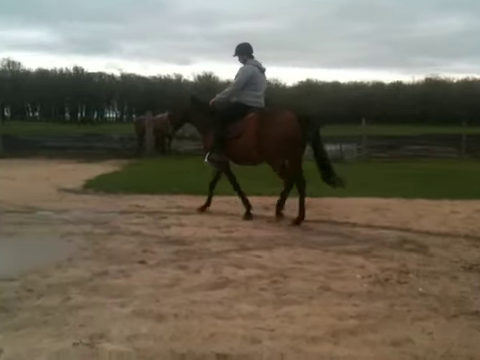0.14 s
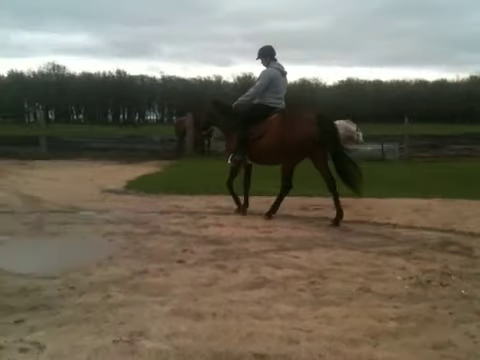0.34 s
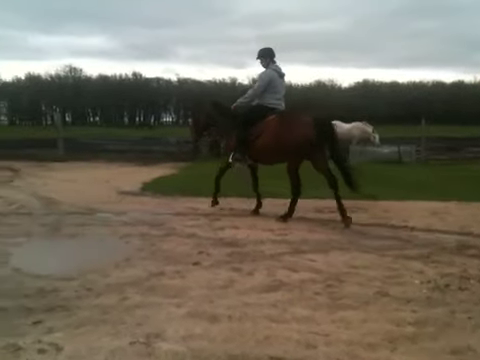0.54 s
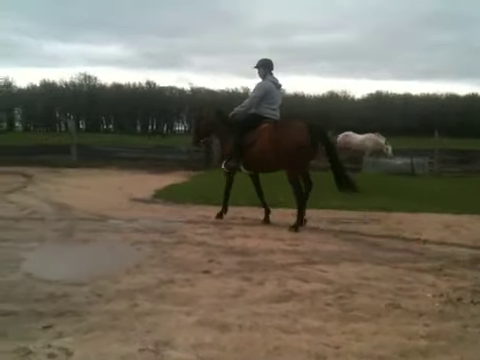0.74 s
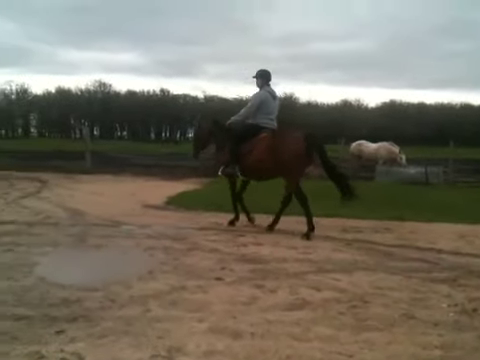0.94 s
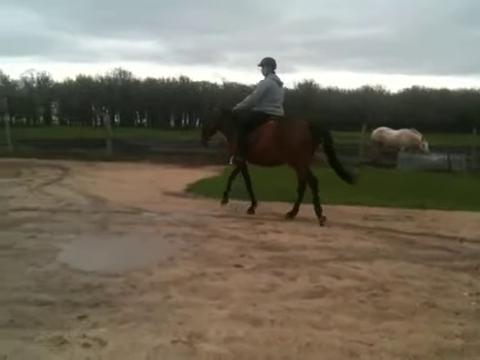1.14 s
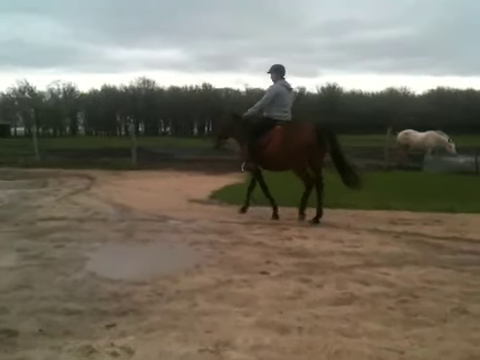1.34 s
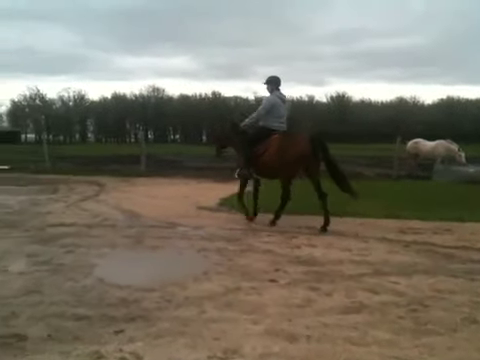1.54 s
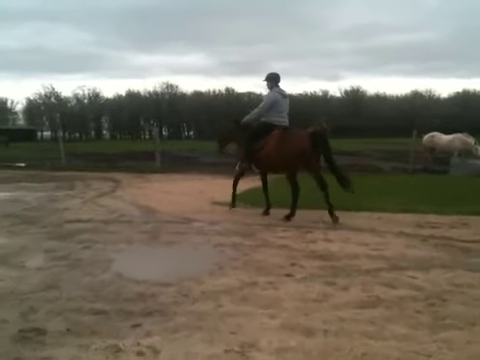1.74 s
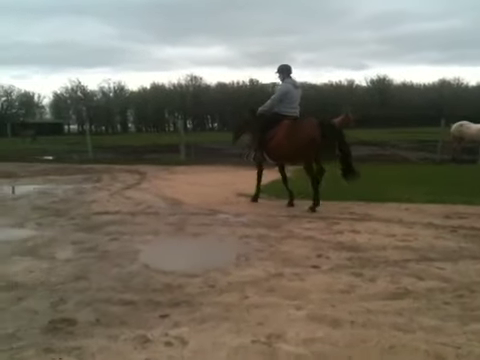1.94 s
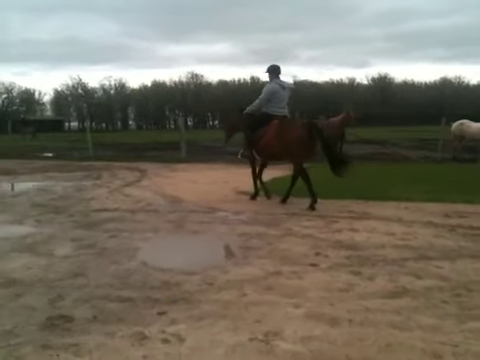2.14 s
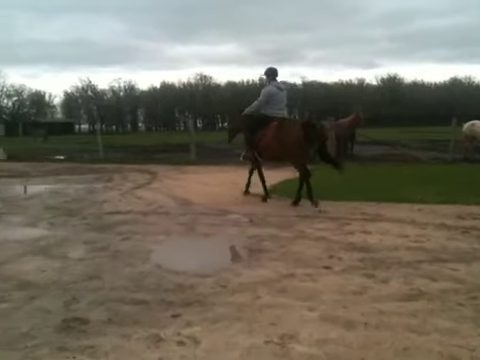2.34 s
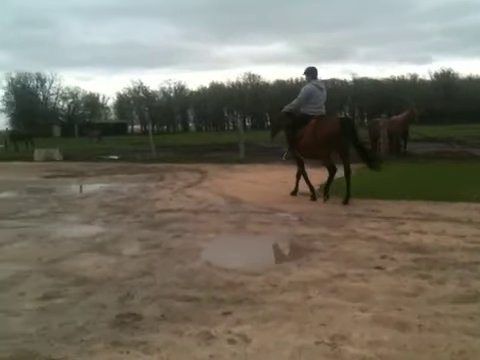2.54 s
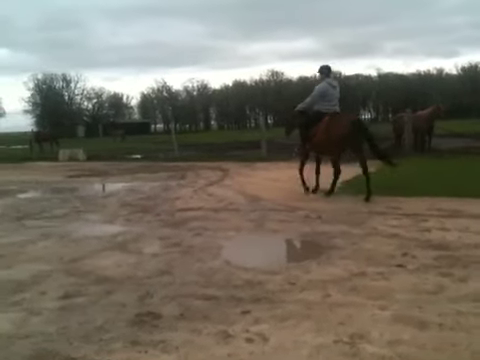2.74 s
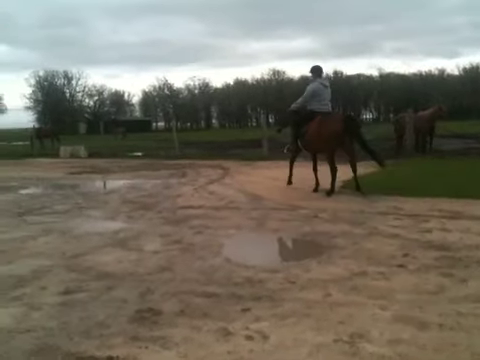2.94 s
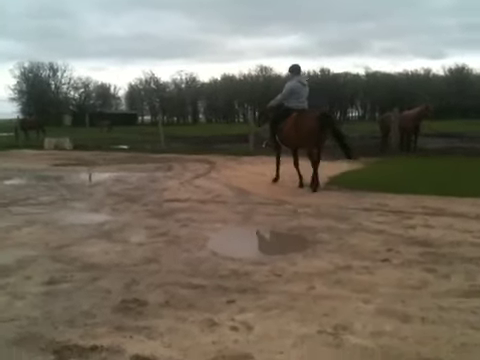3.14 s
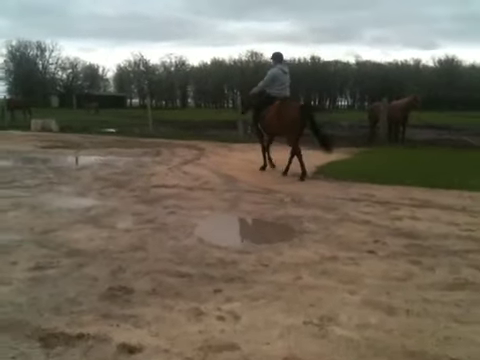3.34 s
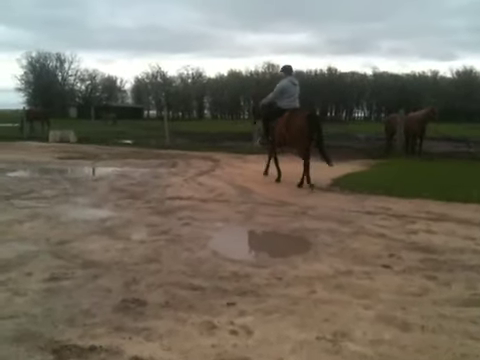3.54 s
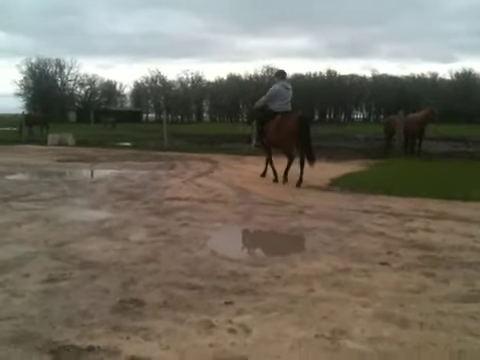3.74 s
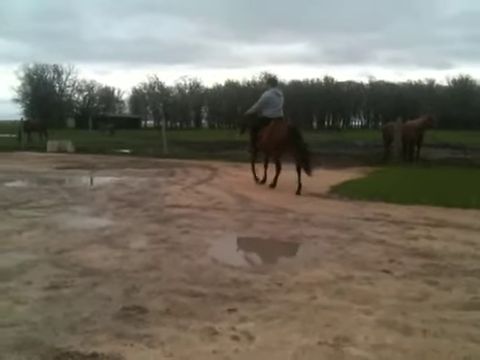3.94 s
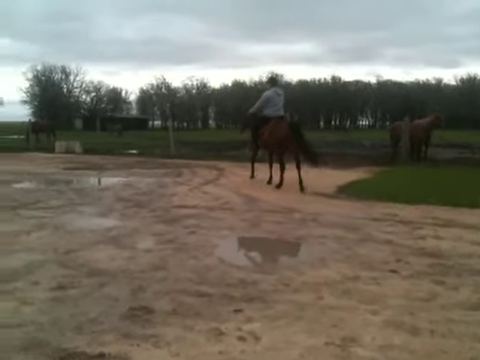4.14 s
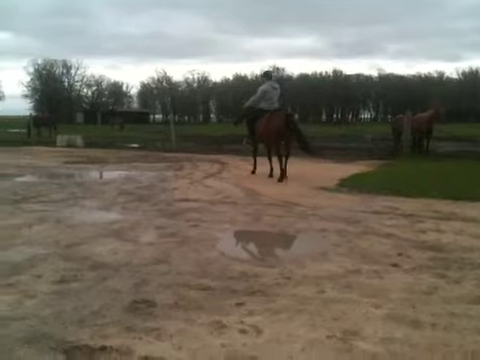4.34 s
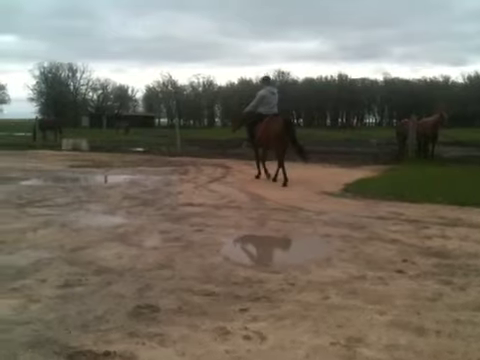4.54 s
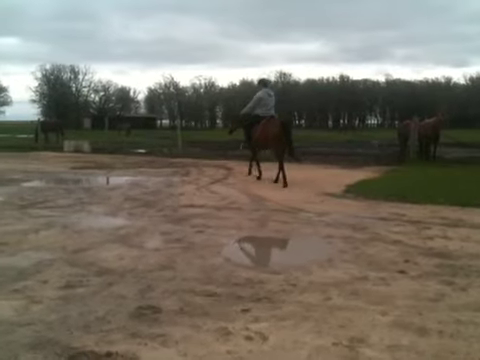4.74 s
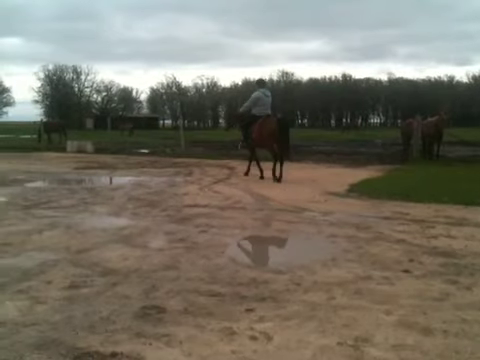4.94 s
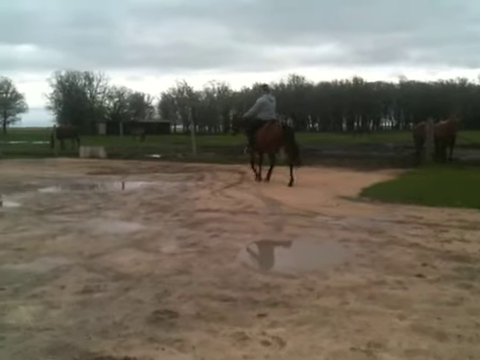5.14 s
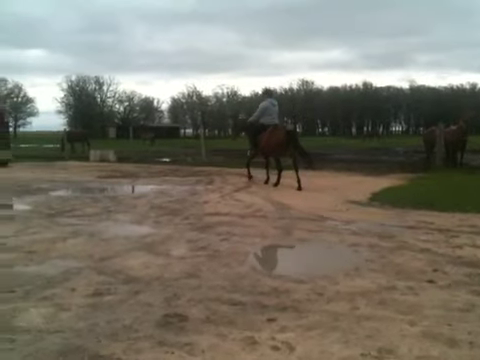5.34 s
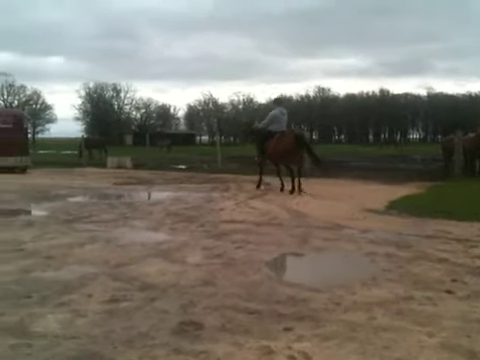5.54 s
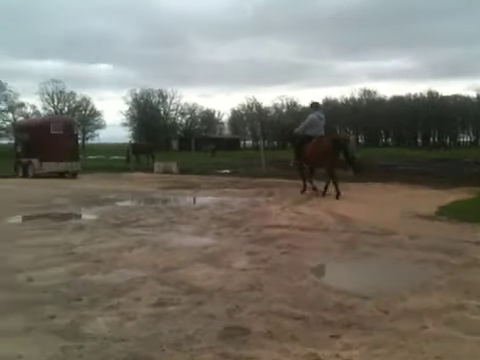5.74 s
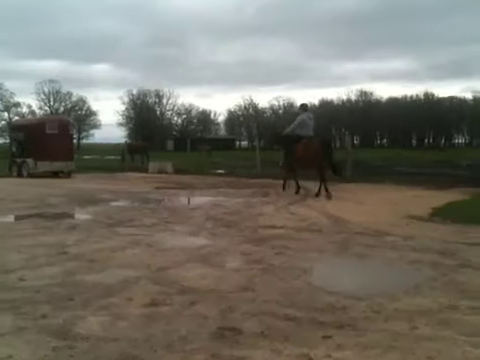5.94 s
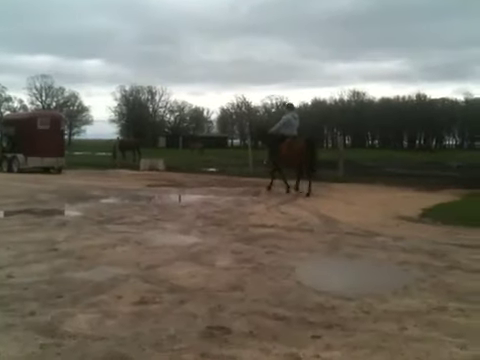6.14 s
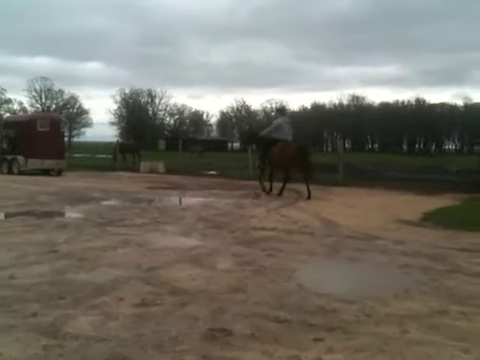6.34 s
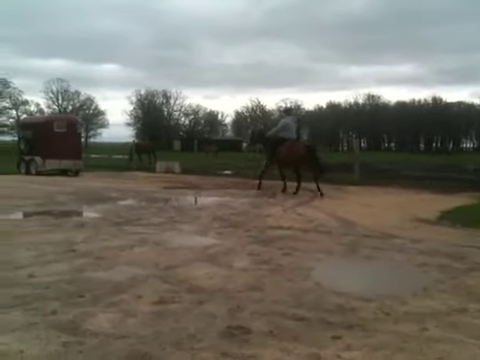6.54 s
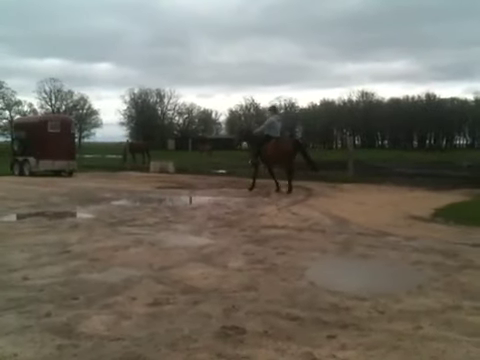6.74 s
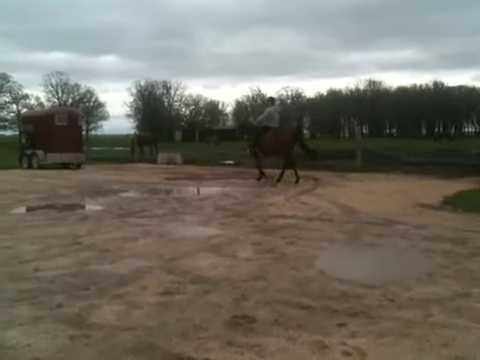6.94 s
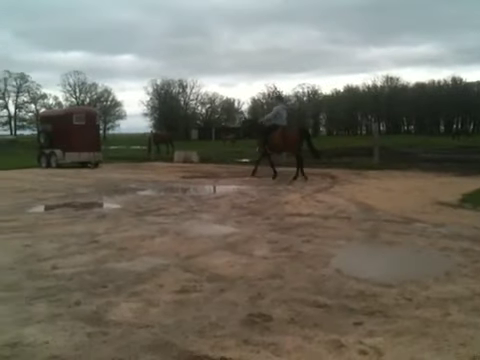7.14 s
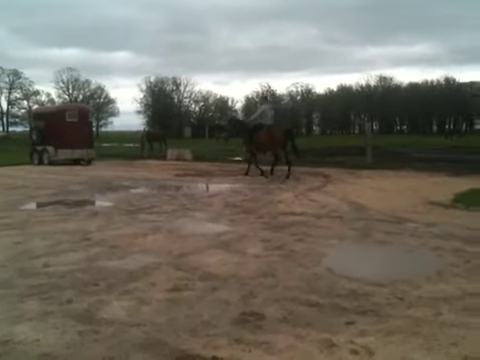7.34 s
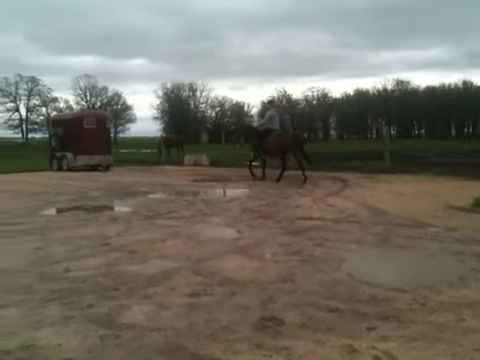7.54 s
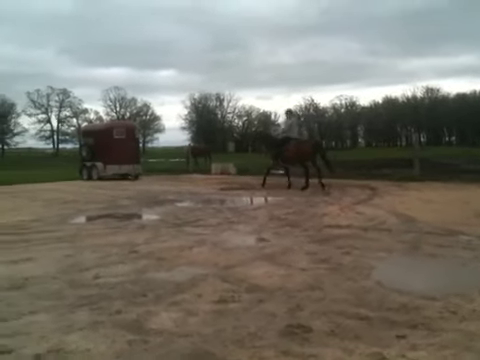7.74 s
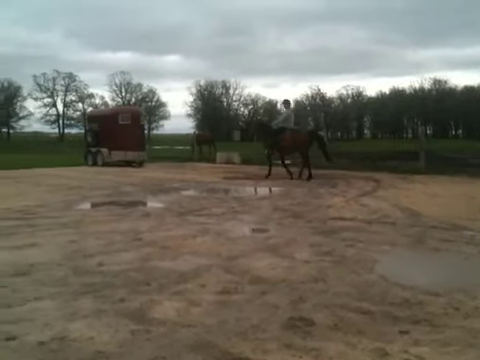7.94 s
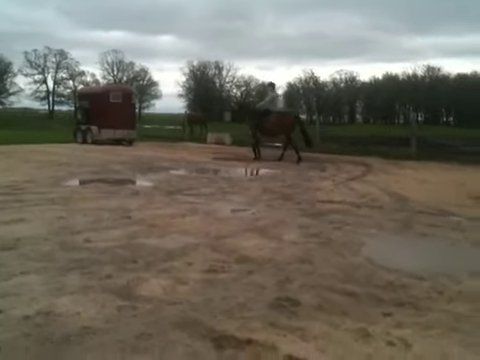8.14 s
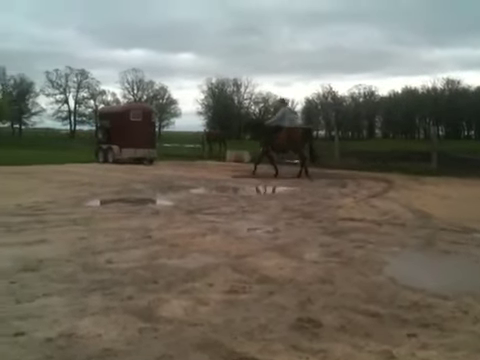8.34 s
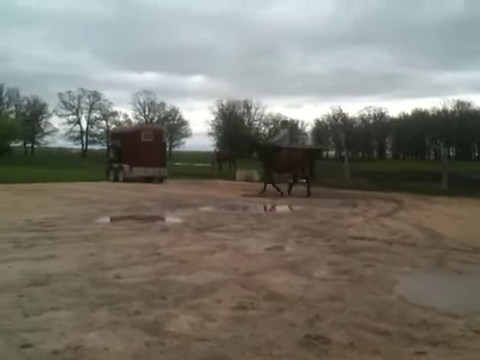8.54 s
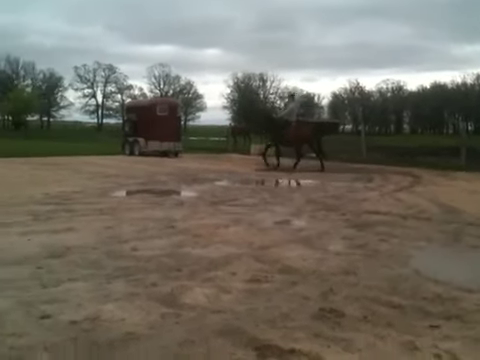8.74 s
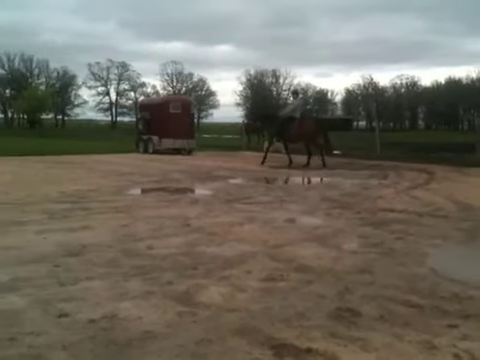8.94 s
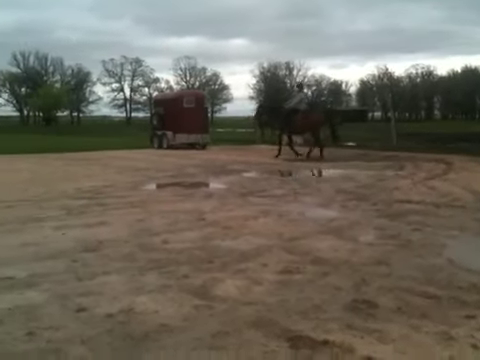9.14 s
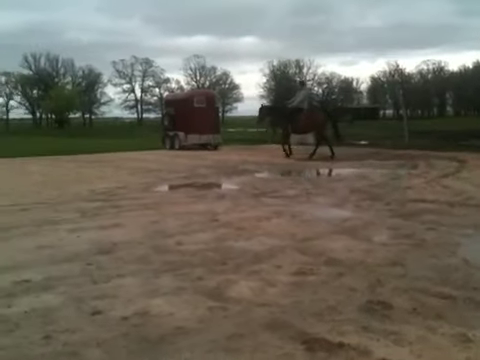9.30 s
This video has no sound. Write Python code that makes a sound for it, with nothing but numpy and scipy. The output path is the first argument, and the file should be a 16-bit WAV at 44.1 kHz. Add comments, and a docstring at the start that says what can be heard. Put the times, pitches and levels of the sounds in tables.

```python
"""Gusts buffet the microphone first; after about four seconds they leave a quiet outdoor hush and a far bird's trill.
In front, a horse moves away over a wet sand arena: hooves crunch into the grit, scuff out and flick small stones.
Wind, sand and hush are shaped noise; stones, shoes, bird and a faint tone are sines under envelopes.
The small camera adds a low hum of noise and a thin, very high whine, and limits the band at both ends."""
import sys
import numpy as np
from scipy import signal
from scipy.fft import rfft, irfft, next_fast_len
from scipy.io import wavfile
from scipy.ndimage import uniform_filter1d, map_coordinates

SR = 44100
rng = np.random.default_rng(int(sys.argv[2]) if len(sys.argv) > 2 else 0)


def dump(signal):
    """Clip the signal to [-1, 1] and save it as 16-bit WAV at the path in sys.argv[1]."""
    limited = np.clip(np.atleast_2d(signal).T, -1, 1)
    pcm = np.round(limited * 32767).astype(np.int16)
    wavfile.write(sys.argv[1], SR, pcm)


N = 413216

# Levels in the tables stand before any trim in the functions. Spectra give shape only: they are scaled afterwards.

# Outdoor hush with its low hum: freq_hz, level_db (per Hz)
HUSH_SPECTRUM = [(25, -10), (60, -28), (92, -23), (125, -3.5), (220, 1), (305, -6), (420, -10.5),
                 (1360, -12.5), (2000, -15.5), (2600, -20.5), (3500, -20), (4800, -24.5), (7000, -25.5),
                 (14500, -26.5)]
# The camera's whine: pitch_hz, level_db
CAMERA_WHINE = [(14971, -87.5), (15030, -95)]
TOP_HZ = 15800  # the camera passes nothing from here up

# Far bird's trill, swelling and fading: time_s, level_db
TRILL_LEVEL = [(5.2, -92), (5.6, -74), (6.25, -76), (6.42, -69), (6.6, -80), (7.15, -70.5), (7.5, -78),
               (7.9, -95)]
# Faint, sagging tone behind the wind
TONE_S, TONE_LENGTH_S, TONE_HZ, SAG_HZ_PER_S, TONE_DB = 1.63, 0.31, 630, 150, -75.5

# Breeze on the microphone, dying away: time_s, level_db
BREEZE_LEVEL = [(0, -40.5), (0.15, -53.5), (0.38, -47), (0.6, -55), (0.8, -46), (1.5, -49), (1.66, -57),
                (2.0, -59.5), (2.48, -63.5), (2.87, -55.5), (3.09, -49.5), (3.27, -71), (3.76, -67),
                (4.2, -82), (4.45, -76), (4.7, -89)]
FLUTTER_DB, FLUTTER_RATE = 4, 32  # depth of its flutter, random knots a second
# Gusts on top of the breeze: centre_s, level_db, length_s
GUST_SWELLS = [(0.068, -34.5, 0.056), (0.336, -45, 0.022), (0.757, -43, 0.025), (0.82, -42, 0.045),
               (0.95, -32, 0.036), (1.034, -35, 0.033), (1.072, -34.5, 0.019), (1.148, -35.5, 0.015),
               (1.235, -43, 0.065), (1.447, -37, 0.015), (1.538, -41.5, 0.03), (1.705, -45.5, 0.025),
               (1.818, -41, 0.03), (1.96, -56, 0.071), (2.179, -42, 0.02), (2.25, -51.5, 0.02),
               (2.335, -44.5, 0.048), (2.598, -43, 0.023), (2.712, -41, 0.059), (2.98, -43.5, 0.06),
               (3.117, -40, 0.016), (3.16, -39.5, 0.034), (3.395, -58.5, 0.019), (3.5, -56, 0.032),
               (3.637, -47, 0.025), (3.87, -64, 0.046), (4.02, -63, 0.031)]
# Wind rumble, its brighter edge and its deep part: freq_hz, level_db (per Hz) in each
BUFFET_SPECTRUM = [(25, -39), (50, -37), (80, -17.5), (120, -4.5), (180, 3), (275, -6), (460, -25),
                   (700, -39.5), (1500, -75)]
EDGE_SPECTRUM = [(150, -33), (300, -3.5), (500, -18), (800, -23.5), (1500, -36), (3000, -70)]
BASS_SPECTRUM = [(25, -2), (50, -11), (100, 3), (150, -3), (300, -30), (800, -60)]
# Sharpest eddies popping on the microphone: centre_s, peak_db, width_s (centre to either peak)
EDDY_POPS = [(0.051, -31, 0.00059), (0.083, -34, 0.0005), (0.3254, -37, 0.0007), (0.9315, -38.5, 0.00043),
             (1.5337, -32, 0.0007), (2.1779, -38, 0.00093)]

# Longer sprays of loose sand: centre_s, level_db, length_s
SAND_SPRAYS = [(0.01, -66.5, 0.034), (0.87, -72, 0.1), (2.72, -70.5, 0.16), (3.2, -70.5, 0.1),
               (5.68, -72, 0.18), (7.25, -72, 0.2), (8.86, -72.5, 0.32), (9.33, -75, 0.22)]
# Falling sand: freq_hz, level_db (per Hz)
SPRAY_SPECTRUM = [(1200, -18), (2200, -5), (2800, -4), (3500, -0.5), (4700, -3.5), (6300, -2), (7500, -3.5),
                  (9200, -6), (10500, -9.5), (14500, -14.5)]
# Thrown sand: level against the hoof's level_db, time constant of its rise, t60 of its patter; ever-present level
PATTER_DB, FLIGHT_S, PATTER_T60_S, LOOSE_SAND_DB = -30, 0.031, 0.54, -81.5

# Shoes ringing faintly on gravel: start_s, level_db
SHOE_CLINKS = [(4.444, -58), (4.966, -61), (6.746, -56), (6.767, -61), (7.015, -59), (7.531, -61),
               (7.595, -56), (8.798, -58)]
SHOE_HZ = 3605  # middle of the shoes' scattered pitches
# Dull low knocks of hooves and stones: start_s, level_db, pitch_hz
LOW_KNOCKS = [(1.022, -57, 1390), (1.081, -61, 1300), (1.601, -56, 1130), (1.63, -56.5, 1130),
              (2.203, -55, 1400), (3.952, -60, 2010), (7.174, -57.5, 1710), (7.21, -62, 1100),
              (7.596, -61, 1700), (7.704, -63, 1710), (8.918, -63, 1200)]
# A low knock pitched at 1500 Hz: freq_hz, level_db (per Hz)
LOW_KNOCK_SPECTRUM = [(700, -25), (1200, -4), (1500, 1), (1850, -10), (3000, -23.5)]
# Flicked stones: start_s, knock_db, ring_db, pitch_hz
FLICKED_STONES = [(0.327, -51, -31, 7200), (0.429, -53, -31, 7870), (0.444, -47, -35.5, 7250),
                  (0.83, -58, -45, 7050), (2.091, -54.5, -50, 6400), (2.139, -56.5, -50, 6900),
                  (2.269, -61, -49, 5940), (3.438, -63, -44, 6550), (3.44, -59, -41.5, 3350),
                  (3.448, -55, -43, 6100), (3.864, -61, -40.5, 6750), (4.27, -56, -53, 4650),
                  (4.567, -61, -49, 6520), (6.001, -56, -63, 5450), (7.704, -55, -41.5, 3620),
                  (8.474, -54.5, -48.5, 2660), (8.674, -57, -43, 10100), (8.681, -52.5, -39.5, 10700),
                  (8.682, -61, -47.5, 2550), (8.699, -56, -49, 10700), (8.919, -56, -53, 5600)]
# What a stone rings with: pitch_multiple, level_db
STONE_MODE_LEVELS = [(0.25, -23.5), (0.52, -13.5), (1, 1.5), (1.42, -8)]
# A stone's gritty knock: freq_hz, level_db (per Hz)
GRITTY_KNOCK_SPECTRUM = [(400, -4), (900, 1.5), (2000, -8.5), (7000, -5), (15000, -19)]

# Hooves dragging out of the sand: time_s, level_db, length_s
HOOF_SCUFFS = [(0.142, -53, 0.035), (0.276, -48.5, 0.063), (0.511, -52.5, 0.09), (0.603, -54, 0.025),
               (0.851, -52, 0.076), (0.9, -49, 0.04), (1.134, -52.5, 0.053), (1.337, -52.5, 0.022),
               (1.451, -51, 0.062), (1.492, -52, 0.028), (1.733, -51, 0.019), (2.525, -54, 0.018),
               (2.646, -46.5, 0.051), (2.906, -50.5, 0.038), (3.096, -55, 0.027), (3.161, -53, 0.087),
               (3.233, -49.5, 0.05), (3.513, -56, 0.051), (3.848, -51.5, 0.079), (4.318, -54, 0.032),
               (4.447, -54, 0.086), (4.488, -51.5, 0.047), (4.782, -52.5, 0.03), (5.12, -51, 0.04),
               (5.41, -53.5, 0.051), (5.596, -49, 0.023), (5.71, -51, 0.061), (6.166, -54, 0.02),
               (6.881, -54.5, 0.042), (7.021, -56, 0.027), (7.43, -53.5, 0.045), (7.712, -51.5, 0.044),
               (8.06, -56.5, 0.022), (8.166, -56, 0.03), (8.291, -56.5, 0.04)]
# Hooves landing: time_s, level_db, crunch_db (against the grit), t60_s
HOOF_LANDINGS = [(0.421, -39.5, -22, 0.076), (0.43, -39.5, -11.5, 0.092), (0.753, -43, -10.5, 0.035),
                 (1.01, -43.5, -16, 0.057), (1.024, -40, -16, 0.11), (1.601, -38.5, -32, 0.05),
                 (1.632, -47, -9, 0.099), (1.941, -48.5, -15, 0.076), (2.084, -46, -16, 0.06),
                 (2.2, -37.5, -20, 0.044), (2.206, -39, -16, 0.076), (2.316, -42, -17, 0.11),
                 (2.794, -44.5, -10, 0.1), (3.353, -44, -27, 0.07), (3.391, -42, -11.5, 0.08),
                 (3.7, -48.5, -15, 0.14), (3.95, -39.5, -16.5, 0.1), (3.999, -45, -12.5, 0.1),
                 (4.106, -45, -16, 0.06), (4.61, -41, -30, 0.092), (4.647, -46, -17, 0.12),
                 (4.966, -52, -12, 0.14), (5.227, -40.5, -13, 0.1), (5.3, -48.5, -13, 0.075),
                 (5.849, -41.5, -14, 0.11), (6.451, -46.5, -12, 0.13), (6.746, -54, -12, 0.08),
                 (7.531, -45.5, -16, 0.043), (7.595, -45, -15, 0.08), (8.726, -48.5, -11.5, 0.063),
                 (8.798, -46, -17, 0.035)]
# Low hump of the grit: freq_hz, level_db (per Hz)
GRIT_LOW = [(1200, -32), (2200, -9), (2800, -13.5), (3400, -1), (4000, -1.5), (4900, -10.5)]
# Upper hump of the grit: centre_multiple, level_db (per Hz)
GRIT_HIGH = [(.9, 0.5), (1.08, 0.5), (1.26, -6.5), (1.47, -8), (1.68, -12.5), (1.95, -15), (2.4, -14)]
# Low crunch of packed sand: freq_hz, level_db (per Hz)
CRUNCH_SPECTRUM = [(150, -21), (350, -0.5), (700, 4), (1300, 0.5), (2100, 1.5), (2800, -5.5), (4500, -45)]
# The grit dulls with distance: limits of its centre near and far, time halfway, time constant of the change
GRIT_NEAR_HZ, GRIT_FAR_HZ, LEAVING_S, LEAVING_SPAN_S = 7150, 6100, 2.4, 2.3


def amp(db):
    """Decibels to gain."""
    return 10 ** (np.asarray(db) / 20)


def unit(x):
    """Scale to rms 1."""
    return x / np.sqrt(np.mean(x ** 2) + 1e-20)


def seconds(length):
    """Sample times in seconds for a number of samples."""
    return np.arange(length) / SR


def curve(rows):
    """One value per sample from (time_s, value) rows."""
    return np.interp(seconds(N), *np.transpose(rows))


def wobble(rate, size=N):
    """A smooth random curve with rate knots a second."""
    knots = rng.standard_normal(int(size * rate / SR) + 4)
    return map_coordinates(knots, [np.arange(size) * rate / SR])


def colour(x, spectrum, shift=1):
    """Give x a spectrum, its frequencies multiplied by shift; rms 1."""
    size = next_fast_len(len(x) + 2048)
    hz, db = np.transpose(spectrum)
    log_hz = np.log(np.fft.rfftfreq(size, 1 / SR) + 1)
    gain = amp(np.interp(log_hz, np.log(hz * shift), db))
    return unit(irfft(rfft(x, size) * gain, size)[:len(x)])


def add(track, s, sound):
    """Mix a sound into the track from time s, cutting what falls outside."""
    start = round(s * SR)
    part = sound[max(-start, 0):max(N - start, 0)]
    track[max(start, 0):][:len(part)] += part


def swells(rows):
    """Summed power of bell-shaped swells from (centre_s, level_db, length_s) rows."""
    t = seconds(N)
    power = np.zeros(N)
    for s, db, length in rows:
        power += amp(db) ** 2 * np.exp(-np.minimum((2 * (t - s) / length) ** 2, 50))
    return power


def background():
    """Steady hush with a low hum of noise, and the camera's whine as sines of slightly wandering phase."""
    t = seconds(N)
    drift_db = .25 * wobble(3)
    hush = amp(-66.5 + drift_db) * colour(rng.standard_normal(N), HUSH_SPECTRUM)
    whine = 0
    for hz, db in CAMERA_WHINE:
        whine += amp(db - 1.0) * np.sqrt(2) * np.sin(2 * np.pi * hz * t + 0.24 * wobble(6.8))
    return hush + whine


def bird():
    """A far trill: about thirty short falling chirps a second, blurred by the trees."""
    turn = np.cumsum(31.5 * (1 + .1 * wobble(11))) / SR % 1
    chirp = np.clip(turn / .5, 0, 1)  # each chirp fills half of its turn
    hz = 6250 - 1300 * chirp
    level = amp(curve(TRILL_LEVEL) - 1.0 + 2 * wobble(20))
    song = level * np.sin(np.pi * chirp) * np.sin(2 * np.pi * np.cumsum(hz) / SR)
    t = seconds(SR // 3)
    trees = rng.standard_normal(len(t)) * amp(-60 * t / 0.47)  # decaying noise as the blur
    return song + signal.fftconvolve(song, trees / np.linalg.norm(trees))[:N]


def faint_tone():
    """A faint sine swells, sags a little in pitch and fades."""
    track, t = np.zeros(N), seconds(SR // 2)
    hz = (TONE_HZ - SAG_HZ_PER_S * t) * (1 + .014 * wobble(45, len(t)))
    swell = np.abs(np.sin(np.pi * np.clip(t / TONE_LENGTH_S, 0, 1))) ** .5
    add(track, TONE_S, amp(TONE_DB) * swell * np.sin(2 * np.pi * np.cumsum(hz) / SR))
    return track


def turbulence(spectrum, size=N):
    """Low noise evened out by its own power over some 30 ms, so that its strength holds nearly steady."""
    x = colour(rng.standard_normal(size), spectrum)
    local_power = np.abs(uniform_filter1d(x ** 2, size=1400))
    return x / np.sqrt(local_power + 0.0011)


def wind():
    """A fluttering breeze and short gusts rumble on the microphone; the harder they blow, the brighter they get."""
    breeze = amp(curve(BREEZE_LEVEL) + 0.5 + FLUTTER_DB * wobble(FLUTTER_RATE))
    force = np.sqrt(breeze ** 2 + swells(GUST_SWELLS))
    edge = amp(-52.0) * (force / amp(-31.0)) ** 1.7
    bass = amp(-60) * (force / amp(-35.5)) ** 0.5  # even a light breeze keeps its deep part
    rumble = force * turbulence(BUFFET_SPECTRUM)
    return rumble + edge * turbulence(EDGE_SPECTRUM) + bass * turbulence(BASS_SPECTRUM)


def pops():
    """A tight eddy passing the microphone port is one quick swing of pressure."""
    track, t = np.zeros(N), np.arange(-SR // 100, SR // 100) / SR
    for s, db, width in EDDY_POPS:
        swing = t / width * np.exp(.5 - .5 * (t / width) ** 2)
        add(track, s + t[0], amp(db) * swing)
    return track


def grains(size, spread_db):
    """Countless tiny impacts of very unequal strength: noise with a fast random level."""
    return rng.standard_normal(size) * amp(spread_db * wobble(2500, size))


def trickle():
    """Sand thrown by each hoof patters back to the ground, now and then in a longer spray."""
    power = amp(LOOSE_SAND_DB) ** 2 + swells(SAND_SPRAYS)
    t = seconds(SR)
    fall = (1 - np.exp(-t / FLIGHT_S)) * amp(-60 * t / PATTER_T60_S)
    for s, db, *_ in HOOF_LANDINGS:
        add(power, s, (amp(db + PATTER_DB) * fall) ** 2)
    unevenness = amp(2.4 * wobble(35))
    return np.sqrt(power) * unevenness * colour(grains(N, spread_db=4.5), SPRAY_SPECTRUM)


def clinks():
    """A shoe grazing a pebble rings briefly in a close pair of modes."""
    track, t = np.zeros(N), seconds(SR // 8)
    envelope = amp(-60 * t / 0.089) * (1 - np.exp(-t / 0.0014))
    for s, db in SHOE_CLINKS:
        hz = SHOE_HZ * (1 + 0.013 * rng.standard_normal())
        upper_hz = hz * rng.uniform(1.0, 1.05)
        ring = np.sin(2 * np.pi * hz * t) + amp(-6) * np.sin(2 * np.pi * upper_hz * t)
        add(track, s, amp(db - 4.5) * ring * envelope)
    return track


def low_knocks():
    """A hoof or a stone gives a short, dull knock: a decaying band of noise."""
    track, t = np.zeros(N), seconds(SR // 8)
    envelope = amp(-60 * t / 0.074) * (1 - np.exp(-t / 0.00058))
    for s, db, hz in LOW_KNOCKS:
        knock = colour(rng.standard_normal(len(t)), LOW_KNOCK_SPECTRUM, hz / 1500)
        add(track, s, amp(db) * knock * envelope)
    return track


def stones():
    """A flicked stone clicks with four short modes, the high ones dying first, and a gritty knock."""
    track, t = np.zeros(N), seconds(SR // 30)
    for s, knock_db, ring_db, pitch_hz in FLICKED_STONES:
        ring = 0
        for multiple, level_db in STONE_MODE_LEVELS:
            hz = pitch_hz * multiple
            t60 = 0.0062 * (6000 / hz) ** 0.49
            phase = rng.uniform(0, 2 * np.pi)
            ring += amp(level_db - 60 * t / t60) * np.sin(2 * np.pi * hz * t + phase)
        click = ring * (1 - np.exp(-t / 0.00038))
        knock = colour(rng.standard_normal(len(t)), GRITTY_KNOCK_SPECTRUM) * amp(-60 * t / 0.015)
        add(track, s, amp(ring_db) * click + amp(knock_db) * knock)
    return track


def grit_centre(s):
    """Centre of the grit in Hz at time s: it sinks as the horse leaves."""
    nearness = .5 * (1 - np.tanh((s - LEAVING_S) / LEAVING_SPAN_S))
    return GRIT_FAR_HZ + (GRIT_NEAR_HZ - GRIT_FAR_HZ) * nearness


def sand(size, grit_hz, spread_db):
    """Grinding sand of rms 1: a fixed low hump and an upper one placed by grit_hz."""
    floor_hz = GRIT_LOW[-1][0] + 1  # the upper hump stays above the low one
    top = [(max(grit_hz * multiple, floor_hz), db) for multiple, db in GRIT_HIGH]
    return colour(grains(size, spread_db), GRIT_LOW + top)


def off_ground(x, depth):
    """Add a copy that bounced off the ground a split second later: every step gets its own notches."""
    size = next_fast_len(len(x) + 256)
    delay_s = rng.uniform(0.000398, 0.001097)
    comb = 1 + depth * np.exp(-2j * np.pi * np.fft.rfftfreq(size, 1 / SR) * delay_s)
    return unit(irfft(rfft(x, size) * comb, size)[:len(x)])


def scuffs():
    """A dragging hoof throws sand: clumps of grains swell and fade."""
    track, t = np.zeros(N), seconds(SR // 4) - .1
    for s, db, length in HOOF_SCUFFS:
        clumps = amp(2.93 * wobble(192.2, len(t)))
        stroke = np.exp(-np.abs(2 * t / length) ** 1.2) * clumps
        grit = sand(len(t), grit_centre(s), spread_db=5)
        crunch = colour(grains(len(t), spread_db=1.0), CRUNCH_SPECTRUM)
        texture = off_ground(grit + amp(-7) * crunch, depth=0.44)
        add(track, s - .095, amp(db - 13) * stroke * texture)
    return track


def hooves():
    """A hoof packs the sand: a quick, clumpy burst of grit over a lower crunch, dying as the weight settles."""
    track, t = np.zeros(N), seconds(SR // 4)
    for s, db, crunch_db, t60 in HOOF_LANDINGS:
        attack = np.clip(t / 0.0088, 0, 1) ** 2
        settling = amp(-60 * np.maximum(t - .013, 0) / t60)
        press = attack * settling * amp(1.45 * wobble(300, len(t)))
        grit = sand(len(t), grit_centre(s), spread_db=3.5)
        crunch = colour(grains(len(t), spread_db=3.5), CRUNCH_SPECTRUM)
        texture = off_ground(grit + amp(crunch_db + 8.0) * crunch, depth=0.37)
        add(track, s - .007, amp(db - 13.0) * press * texture)
    return track


def scene():
    """Background, bird, wind and horse at one microphone."""
    surroundings = background() + bird() + faint_tone() + wind() + pops()
    horse = trickle() + clinks() + low_knocks() + stones() + scuffs() + hooves()
    return (surroundings + horse)[None]


def record(dry, low_cut_hz=80):
    """The camera thins out the deep bass and keeps nothing above its band limit."""
    size = next_fast_len(N + SR // 2)
    hz = np.fft.rfftfreq(size, 1 / SR)
    low_cut = hz ** 2 / np.hypot(hz ** 2, low_cut_hz ** 2)
    return irfft(rfft(dry, size) * low_cut * (hz < TOP_HZ), size)[..., :N]


dry = scene()
out = record(dry)
dump(out)
```